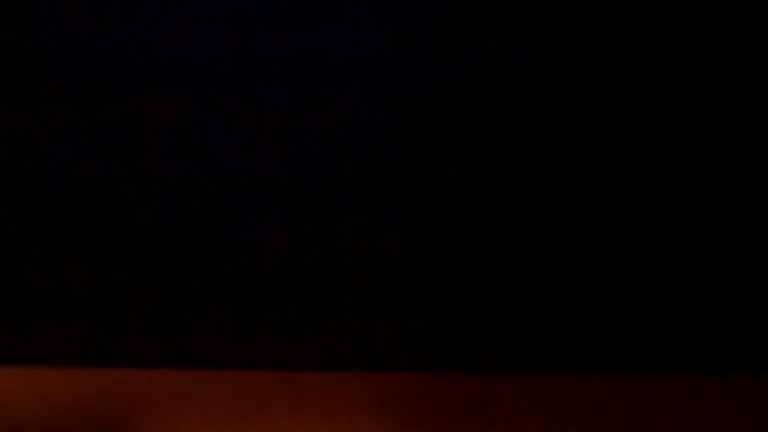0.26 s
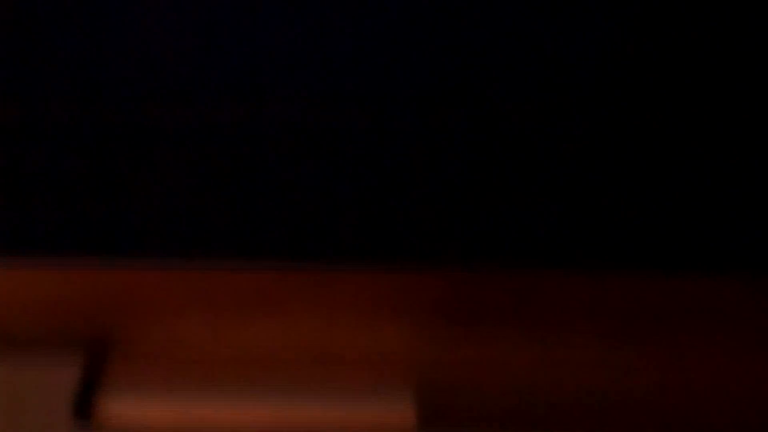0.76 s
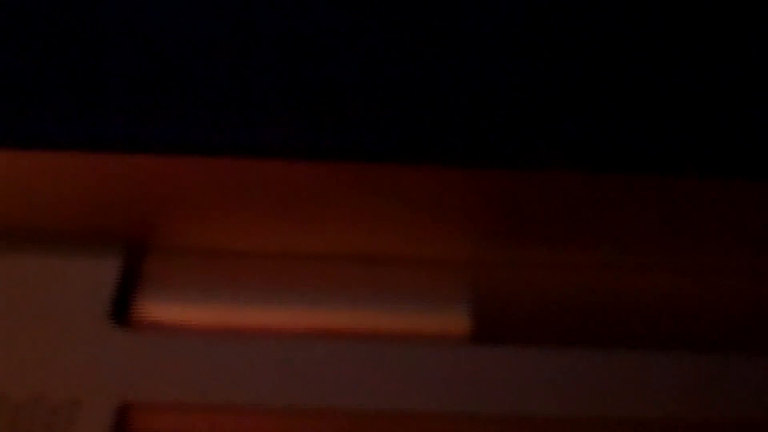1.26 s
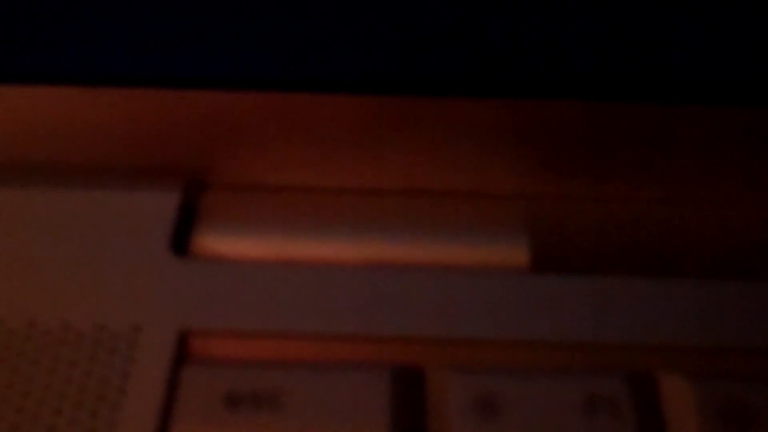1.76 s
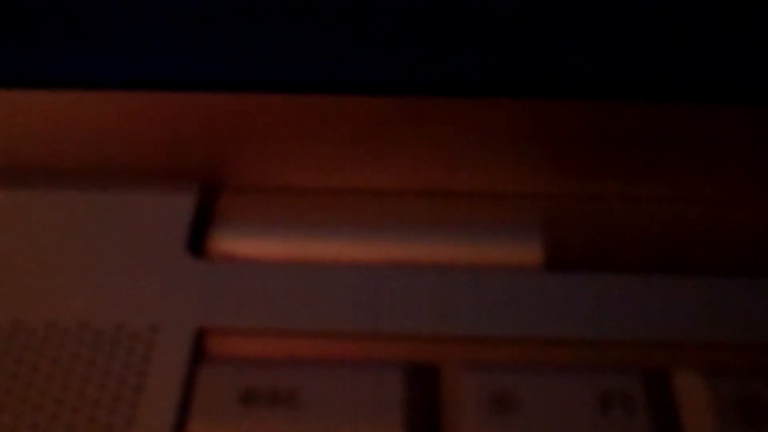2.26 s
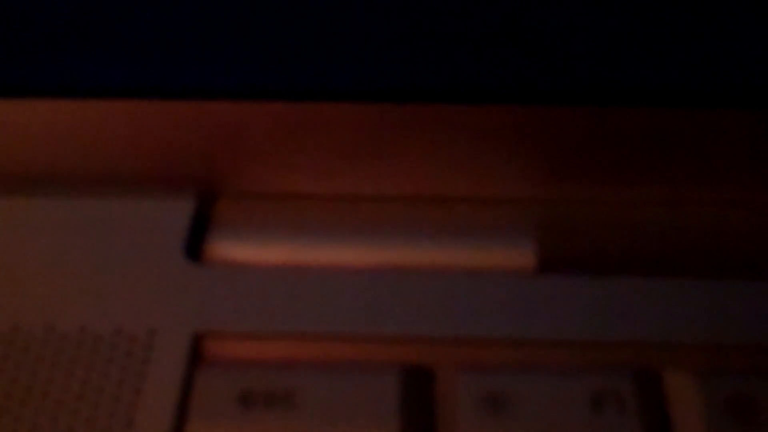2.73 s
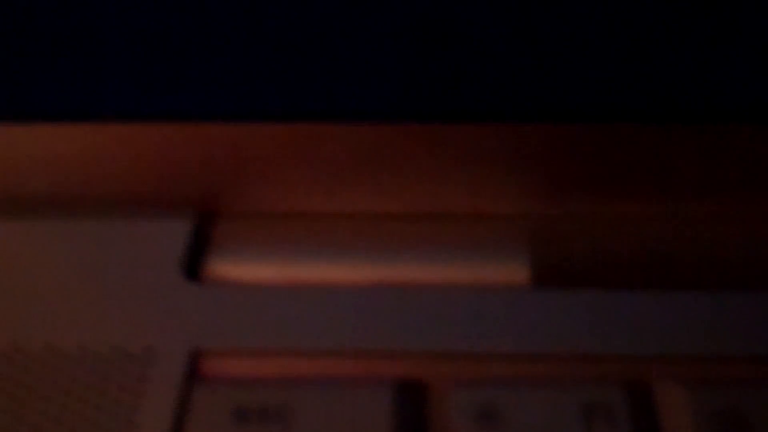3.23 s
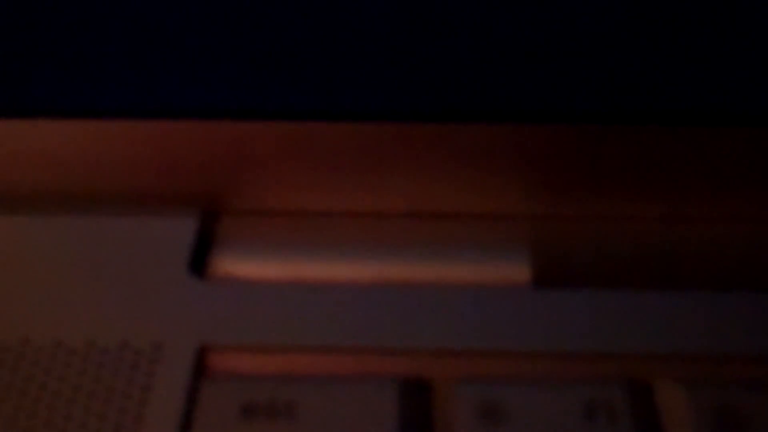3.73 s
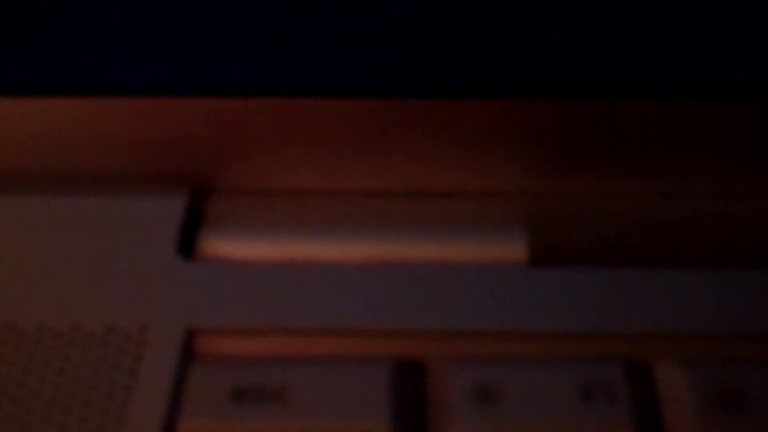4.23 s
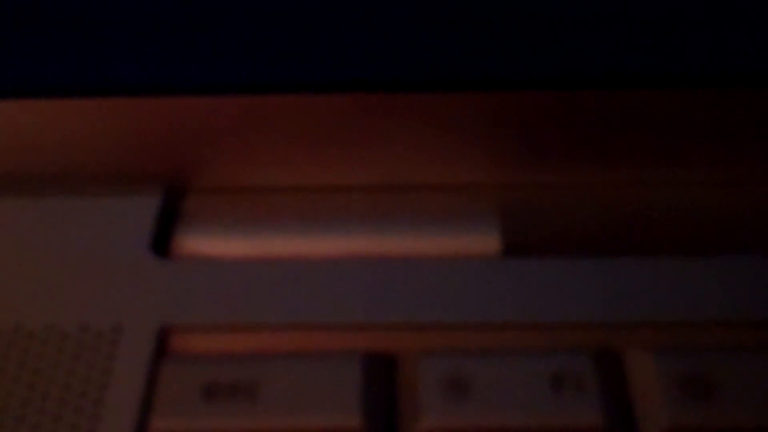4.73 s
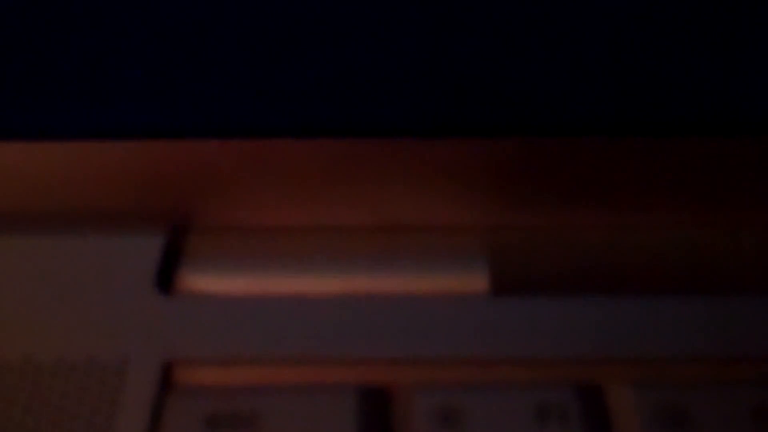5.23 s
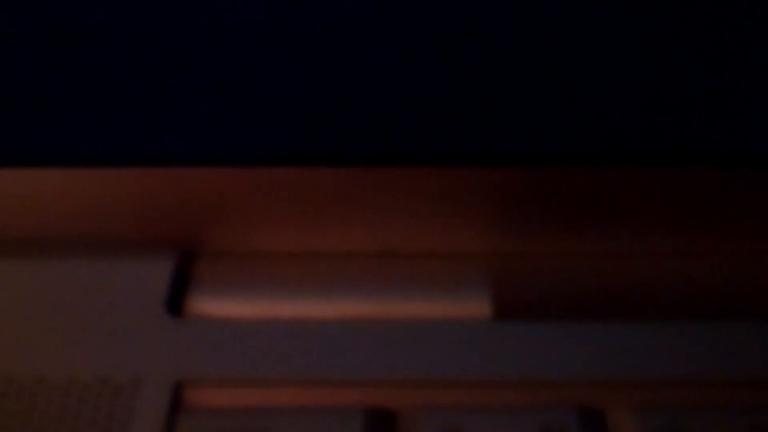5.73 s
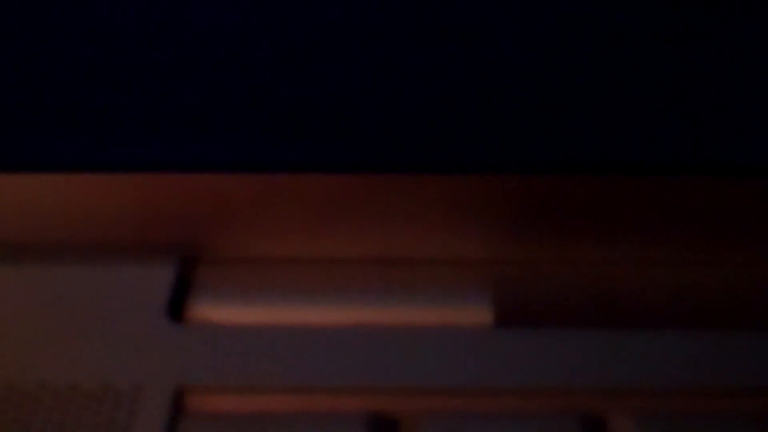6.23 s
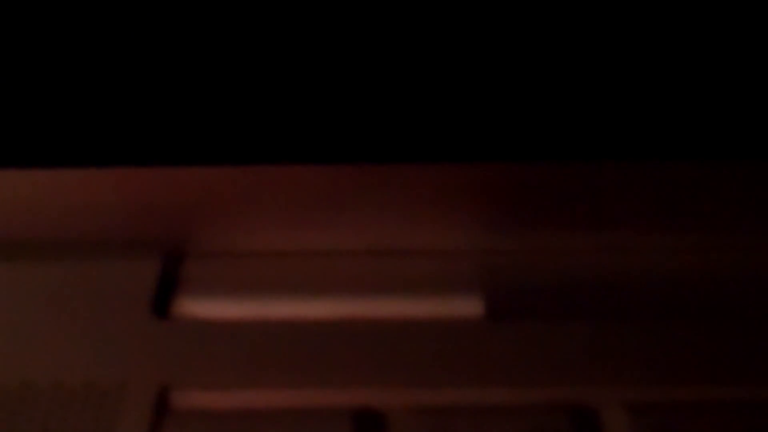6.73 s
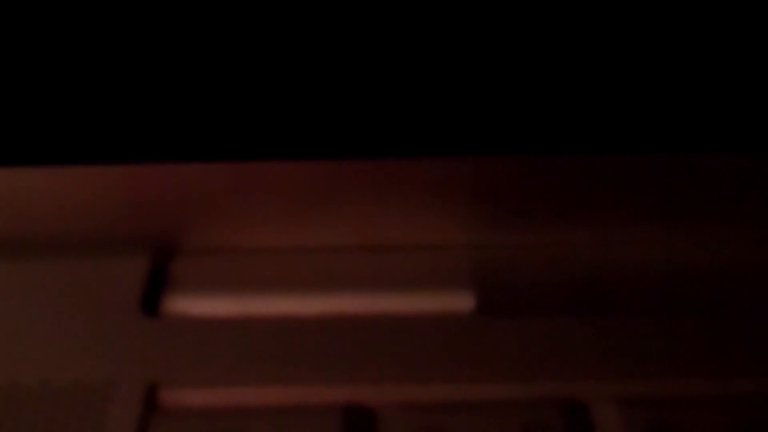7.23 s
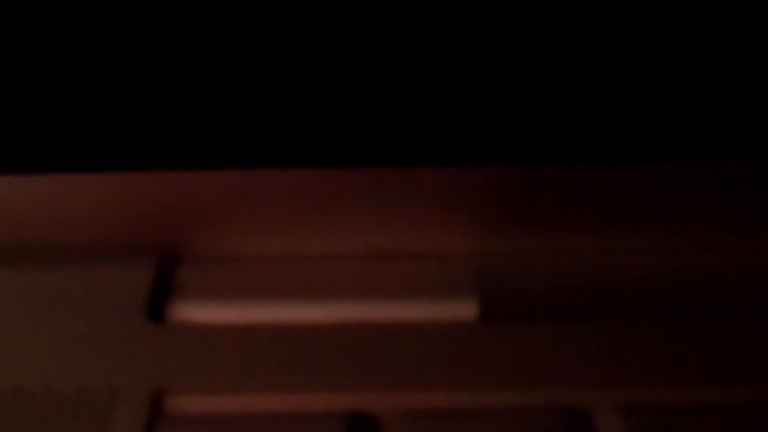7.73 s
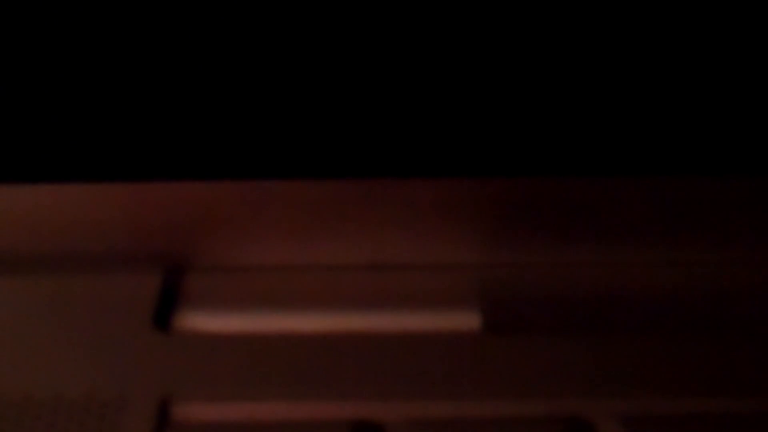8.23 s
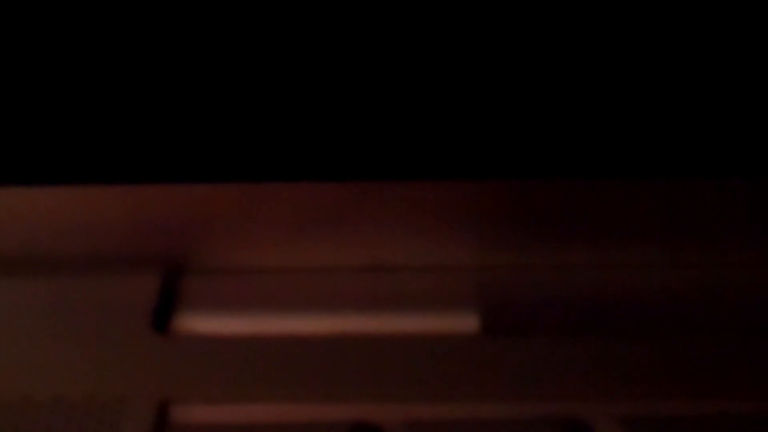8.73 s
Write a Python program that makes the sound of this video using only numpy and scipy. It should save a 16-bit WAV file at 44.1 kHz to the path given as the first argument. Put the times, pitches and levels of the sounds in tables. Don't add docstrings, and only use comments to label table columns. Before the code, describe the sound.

A small laptop cooling fan with a worn bearing, heard extremely close in a quiet room through a stereo microphone. A sharp, high whistling puff of air lasts about a tenth of a second at the start. The fan is already running: a loud, raspy buzz of rapid knocks, near 177 per second, with a beating roughness around 33 per second, metallic casing ring strongest between about 600 Hz and 5 kHz, and thin rushing air. Over the first two seconds it warms up slightly louder. Low soft handling bumps and faint hissy air brushes occur, notably near 0.8, 3.3, 4 and 6.6 seconds. From 5.2 to 5.7 the wavering buzz locks steadier and a little duller. Just before 8 seconds power is cut; the pitch slides down briefly, tones flutter, and by 8.25 the rattle is gone. Only faint room hiss remains, with two very weak hum swells near 8.5 and 8.8.

```python
import sys
import numpy as np
from scipy import signal
from scipy.fft import rfft, irfft
from scipy.io import wavfile
from scipy.ndimage import uniform_filter1d

SR = 44100
rng = np.random.default_rng(int(sys.argv[2]) if len(sys.argv) > 2 else 0)


def field_ratio(decibels):
    return 10 ** (np.asarray(decibels, dtype=float) / 20)


def master(y):
    cut = np.clip(np.atleast_2d(y).T, -1, 1)
    pcm = np.round(cut * 32767)
    wavfile.write(sys.argv[1], SR, pcm.astype(np.int16))


N = 396018
TIME_S = np.arange(N) / SR

# pitch_hz, side_minus_mid_db
PORT_SIDE = [(60, -6), (99, -14), (160, -23), (270, -9), (450, -33), (740, -14.5), (1210, -19),
             (2000, -7.5), (3310, -39), (4200, -8), (4600, -14), (5000, 0.5), (5900, 7.5), (9010, 6.5),
             (14900, 10)]
# pitch_hz, left_minus_right_db
PORT_PAN = [(60, 1), (99, -1), (160, -0.5), (270, -11.5), (450, 2.5), (740, -2.5), (1210, 1), (2000, 0.5),
            (3310, -1), (4650, -1.5), (5460, -7.5), (6400, -5), (7900, -1), (9010, -1), (14900, 8)]


def rms_one(x):
    return x / np.sqrt(np.mean(x ** 2) + 1e-20)


def in_time(rows):
    s, *columns = np.transpose(rows)
    return [np.interp(TIME_S, s, column) for column in columns]


def at_hz(points, hz):
    pitch_hz, value = np.transpose(points)
    return np.interp(np.log(np.maximum(hz, 1)), np.log(pitch_hz), value)


def drift(rate_hz):
    pole = np.exp(-2 * np.pi * rate_hz * 40 / SR)
    slow = signal.lfilter([1], [1, -2 * pole, pole * pole], rng.standard_normal(N // 40 + 2002))[2000:]
    return np.interp(np.arange(N) / 40, np.arange(len(slow)), rms_one(slow))


def noise(spectrum, alike):
    hz = np.fft.rfftfreq(N, 1 / SR)
    likeness = np.clip(at_hz(alike, hz) if np.ndim(alike) else alike, 0, 1)
    mid, side = rfft(rng.standard_normal((2, N))) * field_ratio(at_hz(spectrum, hz))
    ports = np.sqrt(1 + likeness) * mid + np.sqrt(1 - likeness) * side * [[1], [-1]]
    return rms_one(irfft(ports, N))


def causal(level_db, size=4096):
    cepstrum = irfft(level_db * np.log(10) / 20, size)
    cepstrum[1:size // 2] *= 2
    cepstrum[size // 2 + 1:] = 0
    return irfft(np.exp(rfft(cepstrum)), size)[:size // 2]


def smear(t60, first):
    grit = rng.standard_normal(2048) * field_ratio(-60 * np.arange(2048) / SR / t60)
    grit[0] = first
    flatten = causal(-20 * np.log10(abs(rfft(grit, 4096)) + 1e-3))
    return signal.fftconvolve(grit, flatten)[:1024]


def lock():
    return np.interp(TIME_S, [5.2, 5.73], [0, 1])


def rotor():
    # start_s, turning_hz, whirl_lead_hz
    spin = [(.06, 178.8, 32.1), (.2, 177.7, 33.1), (.7, 177.3, 33.36), (.94, 176.6, 33.55),
            (1.56, 175.9, 33.86), (1.9, 176.35, 33.84), (2.4, 176.15, 33.67), (2.94, 177.0, 33.42),
            (3.5, 176.75, 33.3), (3.8, 177.45, 33.15), (4.2, 176.6, 33.22), (4.55, 177.4, 33.15),
            (4.8, 176.8, 33.08), (5.25, 177.15, 33.05), (5.7, 178.85, 32.52), (6.03, 178.15, 32.45),
            (6.2, 178.9, 32.53), (7.8, 179.15, 32.57)]
    # start_s, turning_hz, whirling_hz, grip_0_to_1
    coasting = [
        (7.972, 179.7, 211.3, 0.87),
        (8.031, 174.8, 204, 0.75),
        (8.1, 173.6, 190, 0.58),
        (8.2, 169.7, 181.3, 0.28),
        (8.27, 152, 176.2, 0.55),
    ]
    powered = [(s, hz, hz + lead_hz) for s, hz, lead_hz in spin]
    turning_hz, whirling_hz = in_time(powered + [row[:3] for row in coasting])
    hunt_hz = 0.15 * drift(4)
    grip = np.clip(in_time(coasting)[2], .01, 1)
    shake_turns = np.interp(lock(), [0, 1], [.004, .001]) + .03 * (1 - grip)
    shake = shake_turns * drift(25)
    return np.cumsum(turning_hz + hunt_hz) / SR + shake, np.cumsum(whirling_hz + hunt_hz) / SR + shake, grip


def effort():
    coast = np.interp(TIME_S, [7.97, 8.222], [0, 1])
    after_s = np.clip(TIME_S - 8.222, 0, .2)

    def course(warm_db, cold_db, warm_s, coast_db, fall_db_per_s):
        cold = cold_db * np.exp(-TIME_S / warm_s)
        return warm_db + cold + coast_db * coast - fall_db_per_s * after_s

    tones_db = course(-29, -2.5, 1.7, 4, 898)
    knocks_db = course(-40.5, -0.5, .6, -2.5, 800)
    hum_db = course(-51, -5.5, 0.54, -15, 300)
    edge_db = course(0.5, 3.5, 0.28, -3, 0)
    return tones_db, knocks_db, hum_db, edge_db


def tones(turn, whirl, grip, tones_db, hum_db):
    main_orders = [(1, 0), (0, 1), (-1, 2), (-3, 4), (2, 0), (1, 1), (0, 2), (-1, 3)]
    high_orders = [(1, 2), (7, -3), (6, -2), (-1, 4), (4, 0), (1, 3), (-1, 5), (4, 1), (3, 2), (1, 4),
                   (6, 0), (-1, 6), (4, 2), (3, 3), (9, -2), (15, -7), (-4, 9), (1, 5), (7, 0), (-6, 11),
                   (6, 1), (12, -4), (5, 2), (-2, 8), (4, 3), (3, 4), (9, -1), (-4, 10), (2, 5), (8, 0),
                   (1, 6), (-6, 12), (-1, 8), (5, 3), (11, -2), (17, -7), (-2, 9), (3, 5), (9, 0), (15, -5),
                   (-4, 11), (8, 1), (14, -4), (1, 7), (7, 2), (0, 8), (6, 3), (12, -2), (-1, 9), (5, 4)]
    top_orders = [(11, -1), (10, 0), (-4, 12), (7, 3), (0, 9), (5, 5), (-2, 11), (4, 6), (10, 1), (3, 7),
                  (-4, 13), (2, 8), (8, 3), (14, -2), (1, 9), (6, 5), (12, 0), (11, 1), (3, 8), (9, 3),
                  (1, 10), (6, 6), (5, 7), (0, 12), (6, 7), (-1, 14), (4, 10), (10, 5), (15, 1), (-4, 17),
                  (2, 12), (14, 2), (7, 8), (13, 3), (19, -2), (6, 9), (12, 4), (11, 5), (17, 0), (-2, 16),
                  (10, 6), (16, 1), (22, -4), (9, 7), (-4, 18), (21, -3), (2, 13), (8, 8), (14, 3), (1, 14)]
    bright_orders = [(7, 9), (0, 15), (6, 10), (12, 5), (5, 11), (11, 6), (16, 2), (-3, 18), (9, 8),
                     (15, 3), (21, -2), (2, 14), (8, 9), (14, 4), (20, -1), (1, 15), (7, 10), (13, 5),
                     (6, 11), (12, 6), (18, 1), (5, 12), (11, 7), (17, 2), (4, 13), (10, 8), (16, 3),
                     (-3, 19), (22, -2), (3, 14), (21, -1), (2, 15), (8, 10), (14, 5), (20, 0), (1, 16),
                     (7, 11), (13, 6), (19, 1), (0, 17), (6, 12), (12, 7), (-1, 18), (5, 13), (11, 8),
                     (17, 3), (23, -2), (16, 4), (8, 11), (14, 6)]
    faint_orders = [(-4, 7), (2, 2), (-6, 9), (-7, 10), (2, 3), (8, -2), (-6, 10), (0, 5), (0, 6), (0, 7),
                    (-6, 8), (-3, 9), (-3, 7), (-5, 10), (-7, 9)]
    # level_db, change_once_locked_db
    main_levels = [(-49.5, 0), (-70.5, -1.5), (-61.5, -4), (-65, -2), (-55, 0.5), (-59.5, -2),
                   (-61.5, -4.5), (-72.5, 4)]
    high_levels = [(-47.5, 2), (-55, 2), (-45.5, 1.5), (-39, 3), (-44, -1.3), (-49, 0.2), (-37.5, -0.5),
                   (-49.5, 0), (-46, 1.5), (-45.5, 4.5), (-49.5, -1.5), (-52.5, -2), (-47, 1), (-54, 5.5),
                   (-38, 0), (-57.5, -15.5), (-47, -14), (-41.5, -1), (-54, 2.5), (-49, -22), (-44.5, -5),
                   (-46, 4), (-49, 1), (-53, 1.5), (-46, -1), (-53, 9), (-47, 2.5), (-56, -16), (-48, 3.5),
                   (-51.5, -1), (-48, -3), (-48, 2), (-51, -4), (-50, 2), (-45, 4), (-56, -18), (-48.5, -9),
                   (-41.5, 0), (-56, -18), (-49, -1), (-49, -7), (-50, -6), (-52, -20), (-43.5, -9),
                   (-44.5, 2.5), (-49, 0.5), (-38, 0), (-46, -2), (-45.5, -20.0), (-50, 1)]
    top_levels = [(-55, 2.5), (-54.5, 1), (-58, -9.1), (-61, 5.8), (-59.5, 0), (-55, -2), (-63, 5),
                  (-58.5, -6), (-72, 8), (-54.5, 2.5), (-55, -2), (-57, -2), (-64, -1), (-57, -20.0),
                  (-51.5, -4), (-58, 4.5), (-62.5, -1), (-56.5, -0.5), (-66, -4), (-53.5, -2), (-58, -7.5),
                  (-68, 5), (-56, -22), (-65, -9.1), (-55, -0.5), (-57.5, 0.5), (-60, -4), (-56, -3),
                  (-59, -20.0), (-64, -4), (-55.5, 2), (-58.5, 1), (-65, 8), (-54, -5), (-61, -20.0),
                  (-57, -2), (-67, -5), (-63, 1), (-61, 4), (-57, -20.0), (-59.5, 6), (-65.5, 2.5),
                  (-53.5, -20.0), (-56.5, 2.5), (-60, -20.0), (-63, -20.0), (-59, -4), (-52, -5),
                  (-61.6, -20.0), (-55, -6)]
    bright_levels = [(-56, 2.5), (-53, -7), (-54.5, 1), (-59, -8), (-68, -1), (-56.5, -7), (-61, 10),
                     (-69, 5), (-68, 5), (-62, 3), (-61, -20.0), (-71, -20.0), (-59, -7), (-64, -20.0),
                     (-63, -20.0), (-55, 7), (-57, -5), (-68, -3), (-65, -6), (-57, -2), (-55, -20.0),
                     (-60, 1), (-56, 3), (-61, -6.9), (-60, -20.0), (-55, -2), (-58, -20.0), (-61, -20.0),
                     (-66, 11), (-53, -1), (-54, -18), (-56, -10), (-58.5, 1.5), (-52.5, -6), (-57, -20),
                     (-56, -18), (-54, -2), (-51.5, -18), (-62, -20.0), (-55.5, 4), (-52.5, 2.8),
                     (-56, -15), (-58, -18), (-55, -2.8), (-55, 7), (-60, -6), (-54.5, -1), (-75, -2),
                     (-62, -3), (-69.3, 7)]
    faint_levels = [(-55.5, 0.5), (-53, 3), (-63, -23), (-57.5, -20), (-57, -2), (-60, 5), (-57.5, -2),
                    (-63, 8), (-55, 0), (-54, 4), (-62, -23), (-55, -10), (-71, 10), (-62, -2), (-59, -20)]
    # start_s, level_db
    beat_sag = [
        (0, 1),
        (2.9, 3.5),
        (3.3, -6),
        (5.2, -4),
        (5.6, 0.5),
    ]
    orders = main_orders + high_orders + top_orders + bright_orders + faint_orders
    levels = main_levels + high_levels + top_levels + bright_levels + faint_levels

    def thin(v):
        return v[::4].astype(np.float32)

    turn_hz, whirl_hz = (uniform_filter1d(np.gradient(v), size=1600)[::4] * SR for v in (turn, whirl))
    flutter_db = 3 * np.clip(.95 - grip, 0, 1) ** .5
    wavers_db = [thin(0.5 * drift(1.9) + flutter_db * drift(14)) for _ in range(6)]
    late_db = thin(-8 * np.exp(-TIME_S / .15))
    keen_db = thin(2 * np.exp(-TIME_S / .3))
    sag_db = in_time(beat_sag)[0][::4]
    turn, whirl, grip = thin(turn % 1), thin(whirl % 1), thin(grip)
    tones_db, hum_db, locked = thin(tones_db), thin(hum_db), thin(lock())
    dying = np.minimum(grip / grip[0], 1) ** 3.6
    out = np.zeros((2, len(turn)))
    for k, ((m, n), (level_db, change_db)) in enumerate(zip(orders, levels)):
        hz = m * 177 + n * 210.3
        chance = rng.random(2).tolist()
        db = level_db + 2 + change_db * locked + wavers_db[k % 6]
        hold = min(abs(n), 2)
        if hz > 500:
            db += tones_db + 31.3 + late_db * (1900 < hz < 2700) + keen_db * (hz > 3050)
        elif m + n == 2:
            db += tones_db + 31.0 - 6 * (1 - grip)
            hold = max(n - 1, 0)
        else:
            db += hum_db + 52.5 + sag_db * (n == 2)
        gain = np.exp(db * float(np.log(10) / 20)) * grip ** hold
        if 500 < hz < 900:
            gain /= 1 + (540 / (m * turn_hz + n * whirl_hz)) ** 40
            if n > 1:
                gain *= dying
        angle = float(2 * np.pi) * (m * turn + n * whirl + chance[0])
        lag = float(field_ratio(at_hz(PORT_SIDE, hz))) * (0.19 + 1.5 * chance[1])
        pan = float(field_ratio(at_hz(PORT_PAN, hz) / 2))
        out[0] += gain * pan * np.sin(angle - lag)
        out[1] += gain / pan * np.sin(angle + lag)
    return signal.resample_poly(out, 4, 1, axis=1)[:, :N]


def knocks(turn, whirl, grip):
    # turning_angle_turns, whirling_angle_turns, strength_db
    spots = [(.65, 0.29, 1), (.7, 0.39, -1), (.95, 0.36, 1), (.15, 0.38, 0), (0.06, 0.43, -1),
             (.9, 0.74, 1), (.5, 0.78, -0.5), (.1, 0.78, -3.5), (.4, 0.3, -1), (.45, 0.11, -6),
             (.5, 0.65, -4), (0.08, 0.76, -2.5), (.85, 0.89, -7.5), (.2, 0.14, -4.5), (0.8, 0.59, -4),
             (0.5, .92, -6.5)]
    stray_s = np.interp(lock(), [0, 1], [2e-5, 8e-6])
    clicks = np.zeros(N + 1)
    for turn_angle, whirl_angle, strength_db in spots:
        passes = np.arange(1, int(turn[-1])) + turn_angle
        chance = rng.standard_normal((len(passes), 2))
        at = np.interp(passes, turn, np.arange(N))
        at = np.clip(at + stray_s[at.astype(int)] * SR * chance[:, 0], 0, N - 1)
        i = at.astype(int)
        meet = np.exp(9.0 * grip[i] * (np.cos(2 * np.pi * (whirl[i] - whirl_angle)) - 1))
        size = meet * field_ratio(strength_db + 1.5 * chance[:, 1])
        np.add.at(clicks, i, size * (1 - at + i))
        np.add.at(clicks, i + 1, size * (at - i))
    return clicks[:N] / np.sqrt(uniform_filter1d(clicks[:N] ** 2, 4410) + 1e-9)


def casing(clicks, edge_db):
    # pitch_hz, level_db_per_hz
    low_colour = [(300, -55.5), (575, -20.5), (605, -6), (700, -6.5), (800, -9.5), (950, -8.5),
                  (1200, -9.5), (1650, -6), (1760, -2)]
    high_colour = [(1850, -17), (2100, -10), (2400, -14), (2650, -17), (2950, -9), (3300, -6), (3600, -7),
                   (3850, -11), (4200, -13), (4650, -5.5), (5000, -9.5), (5400, -17), (6800, -35),
                   (8200, -27.5), (9600, -46)]
    # centre_hz, width_hz, level_db
    modes = [(1980, 88, 3), (2700, 18, -14), (3610, 80, 1), (4520, 74, 9.5)]
    hz = np.fft.rfftfreq(4096, 1 / SR)
    level_db = at_hz(low_colour + high_colour, hz)
    for centre_hz, width_hz, top_db in modes:
        level_db = level_db + 0.22 * top_db / (1 + (2 * (hz - centre_hz) / width_hz) ** 2)
    tighten = smear(0.008, first=4.32)[::-1]
    rubs = signal.fftconvolve(clicks, tighten)[1023:N + 1023]
    side = causal(level_db + at_hz(PORT_SIDE, hz))
    side = signal.fftconvolve(side, smear(0.006, first=0.84))[:2048]
    pan_db = at_hz(PORT_PAN, hz) / 2
    left = np.roll(causal(level_db + pan_db), 1) + 0.86 * side
    right = causal(level_db - pan_db) - 0.8 * side
    rung = signal.fftconvolve(rubs[None], [left, right], axes=1)[:, :N]
    bright = signal.sosfilt(signal.butter(2, [2700, 4200], "band", fs=SR, output="sos"), rung)
    edge = signal.sosfiltfilt(signal.butter(2, 4200, "high", fs=SR, output="sos"), rung)
    return (rung + (field_ratio(edge_db) - 1) * edge) / np.sqrt(np.mean(bright ** 2))


def fin_air(knocks_db):
    # pitch_hz, level_db_per_hz
    colour = [(59, -66), (100, -51), (168, -17), (534, -16), (656, -13.5), (1200, -8), (2550, -14),
              (3580, -5), (9450, -26), (14000, -60)]
    return field_ratio(knocks_db - 3 + 0.28 * drift(5.9)) * noise(colour, 0.9)


def puff():
    # pitch_hz, level_db_per_hz
    colour = [(2350, -37), (4000, -31), (4470, -6), (6710, -3), (7270, 4.5), (7870, 0.5), (8950, 4.5),
              (10500, -6), (13500, -8), (14300, -23)]
    # pitch_hz, level_db
    whistling = [(7111, -48), (7547, -53), (8942, -48), (9491, -58)]
    since_s = TIME_S - 0.035
    db = -33 - np.maximum(-194 * since_s, 98 * since_s)
    db = db - 400 * np.maximum(TIME_S - 0.087, 0)
    whistles = np.zeros(N)
    for hz, level_db in whistling:
        whistles += field_ratio(level_db + 4) * np.sin(2 * np.pi * (hz * TIME_S + 0.12 * drift(30)))
    return field_ratio(db) * (noise(colour, 0.32) + whistles / field_ratio(-33))


def stirring():
    # start_s, level_db, dying_s
    bumps = [(.42, -63.5, .1), (.78, -54, 0.17), (1.14, -62, 0.098), (1.43, -63, .12), (2.65, -68, .3),
             (3.03, -62, 0.11), (3.28, -59, .12), (3.57, -60, 0.073), (3.95, -56, .1), (4.25, -72, .2),
             (6.3, -63, .15), (6.62, -56, 0.28), (7.27, -66.5, 0.12), (7.77, -70.5, .2)]
    # centre_s, level_db, half_width_s
    wisps = [
        (2.62, -63, .1),
        (3.25, -52, .06),
        (4.0, -62, .4),
        (4.98, -58, .1),
        (6.53, -54, .1),
    ]
    rumble_gain = np.full(N, field_ratio(-68.5))
    for s, db, dying_s in bumps:
        rumble_gain += field_ratio(db) * np.exp(np.minimum((TIME_S - s) / 0.11, (s - TIME_S) / dying_s))
    hiss_gain = field_ratio(-60 + 0.6 * drift(1.3))
    for s, db, width_s in wisps:
        hiss_gain += field_ratio(db - 6) * np.exp(-((TIME_S - s) / width_s) ** 2)
    rumble = noise([(40, -25), (80, -11), (120, -7), (250, -2.0), (500, 0), (900, -40)], 0.86)
    hiss = noise([(6000, -32.5), (8000, -29), (9800, -12), (12000, 2.5), (14200, 4.5)], 0.1)
    running = np.interp(TIME_S, [8.21, 8.27], [1, 0])
    return running * (rumble_gain * rumble + field_ratio(6.5) * hiss_gain * hiss)


def mains():
    swell = np.zeros(N)
    for s, db, width_s in [(8.49, -74, .08), (8.78, -68, 0.13)]:
        swell += field_ratio(db + 4.0) * np.exp(-((TIME_S - s) / width_s) ** 2)
    groan_gain = field_ratio(-63) * np.interp(TIME_S, [6.55, 6.65, 7.0, 7.15], [0, 1, 1, 0])
    groan = groan_gain * np.sin(2 * np.pi * (101 * TIME_S + 0.1 * drift(8)))
    return swell * np.sin(2 * np.pi * 119.8 * TIME_S) + groan


def room_floor():
    # pitch_hz, level_db_per_hz
    colour = [(20, -14), (86, -19), (119, -5), (153, -17.5), (300, -11), (2000, -21), (10000, -21),
              (14200, -18)]
    # pitch_hz, likeness_0_to_1
    likeness = [(60, 0.77), (180, 0.55), (540, 0.12), (1640, 0.036), (4940, 0.03), (14900, 0.01)]
    return field_ratio(-53.5) * noise(colour, likeness)


def scene():
    turn, whirl, grip = rotor()
    tones_db, knocks_db, hum_db, edge_db = effort()
    edge_db = edge_db - 2 * lock()
    rattle = field_ratio(knocks_db) * casing(knocks(turn, whirl, grip), edge_db)
    fan = tones(turn, whirl, grip, tones_db, hum_db) + rattle + fin_air(knocks_db)
    return fan + puff() + stirring() + mains() + room_floor()


def top_cut(x):
    return signal.sosfilt(signal.butter(12, 15480, fs=SR, output="sos"), x)


def record(dry):
    hz = np.fft.rfftfreq(N, 1 / SR)
    cut = irfft(rfft(dry) * (hz < 14230), N)
    return top_cut(cut)


dry = scene()
out = record(dry)
master(out)
```